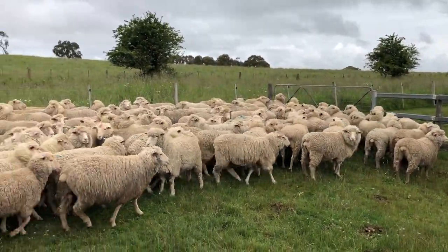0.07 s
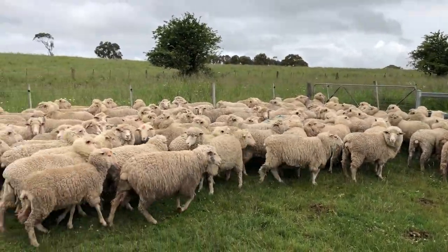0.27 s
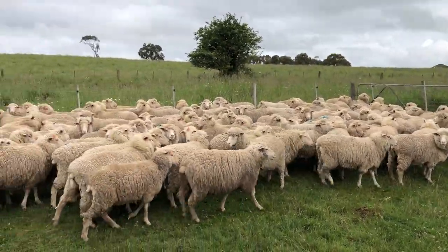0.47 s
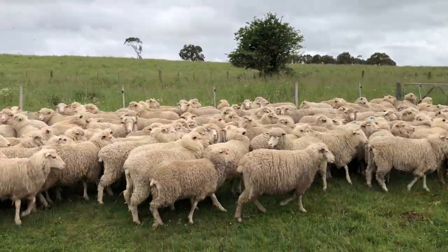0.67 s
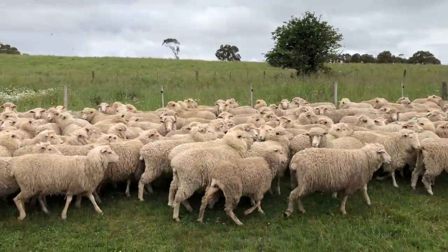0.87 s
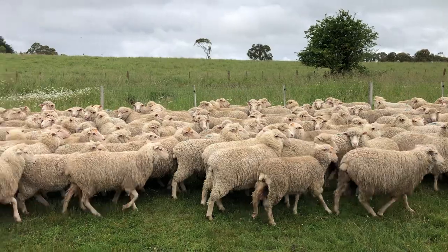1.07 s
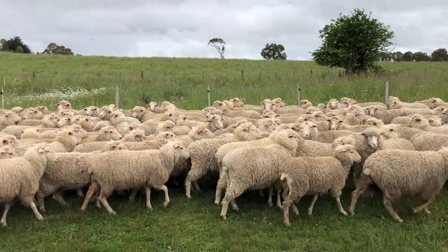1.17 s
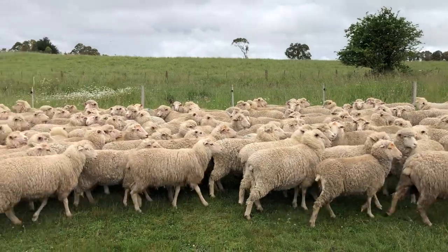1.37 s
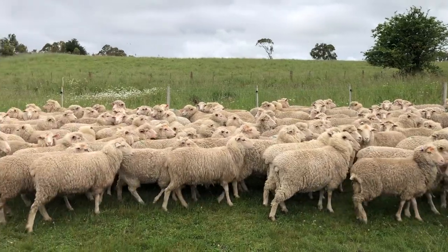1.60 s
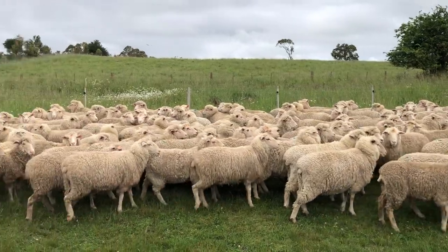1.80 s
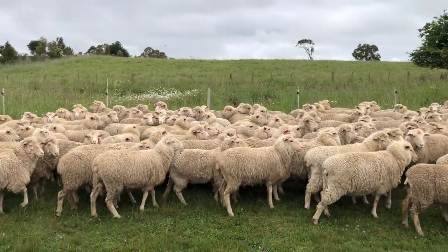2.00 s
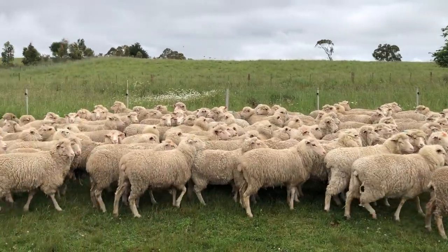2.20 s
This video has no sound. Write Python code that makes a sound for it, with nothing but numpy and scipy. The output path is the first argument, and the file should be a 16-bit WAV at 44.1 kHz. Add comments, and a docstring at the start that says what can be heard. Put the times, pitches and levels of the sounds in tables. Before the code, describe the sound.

A sheep bleats nearby and two answer farther off, with wind thumping on the microphone.

```python
"""A sheep bleats close by while wind buffets the microphone, with a few hard thumps.
Two more sheep answer from across the paddock; each bleat is a train of glottal pulses
filtered by the resonances of the throat. A bird gives falling whistles and a short buzzy rattle.
Underneath, turbulent air rumbles, the open field hisses and hooves brush the grass."""
import sys
import numpy as np
from scipy import signal
from scipy.fft import rfft, irfft
from scipy.io import wavfile

SR = 44100
rng = np.random.default_rng(int(sys.argv[2]) if len(sys.argv) > 2 else 0)


def generate_wav(sig):
    """Save sig (samples, or channels by samples) to the path in sys.argv[1] as 16-bit PCM at SR."""
    pcm = np.round(np.clip(np.atleast_2d(sig).T, -1, 1) * 32767).astype(np.int16)
    wavfile.write(sys.argv[1], SR, pcm)


N = 99225
T = np.arange(N) / SR


def amp(db):
    """Amplitude ratio of a level in decibels."""
    return 10 ** (np.asarray(db) / 20)


def unit(x):
    """Normalisation to rms 1."""
    return x / np.sqrt(np.mean(x ** 2) + 1e-20)


def add(mix, start_s, sound):
    """Superposition of a sound on the mix."""
    part = mix[max(round(start_s * SR), 0):][:len(sound)]
    part += sound[:len(part)]


def drift(hz):
    """Random modulation: low-pass noise of rms 1."""
    f = np.fft.rfftfreq(N, 1 / SR)
    return unit(irfft(rfft(rng.standard_normal(N)) / (1 + (f / hz) ** 4), N))


def colour(x, points, size=8192):
    """Minimum-phase filter through (frequency [Hz], gain [dB]) points."""
    hz, db = np.transpose(points)
    log_f = np.log(abs(np.fft.fftfreq(size, 1 / SR)) + 1)
    log_gain = np.log(amp(np.interp(log_f, np.log(hz), db)))
    response = np.fft.ifft(np.exp(np.conj(signal.hilbert(log_gain)))).real[:size // 2]
    return signal.fftconvolve(x, response)[:len(x)]


def gesture(course, edge_s=0.0072):
    """Pitch contour and amplitude envelope of a call, silent outside it."""
    s, hz, db = np.transpose(course)
    gate = np.clip(1 + np.minimum(T - s[0], s[-1] - T) / edge_s, 0, 1)
    return np.interp(T, s, hz), gate * amp(np.interp(T, s, db))


def voice(course, throat, jitter, shimmer, breath):
    """Source-filter model: uneven pulses, each with a puff of air, excite throat resonances."""
    hz, gain = gesture(course)
    cycles = np.cumsum(hz * (1 + jitter * drift(74))) / SR
    offset = (cycles + .5) % 1 - .5  # cycles from the nearest pulse
    pulses = np.sinc(offset / hz * SR / 2) * np.cos(np.pi * offset) ** 2
    puffs = np.exp(-(cycles % 1) / 0.9) * rng.standard_normal(N)
    source = unit(pulses) * (1 + shimmer * drift(120)) + breath * unit(puffs)
    return gain * unit(colour(source, throat))


# spectrum of the field's hiss (frequency [Hz], gain [dB])
HISS_SPECTRUM = [(500, 10), (1000, 9), (2000, 3.5), (4000, 0.5), (7000, -2.5), (11000, -3), (16000, -5.5)]

def field_hiss(level_db=-65.5):
    """Broadband noise of the open field, nearly constant in level."""
    return amp(level_db + 0.45 * drift(27)) * unit(colour(rng.standard_normal(N), HISS_SPECTRUM))


# hooves brushing grass (time [s], length [s], level [dB], centre frequency [Hz])
HOOF_BRUSHES = [(0.463, 0.0022, -67, 4850), (0.795, 0.012, -60.5, 7000), (0.81, 0.0061, -61.5, 9500),
                (.872, .0015, -65, 5500), (1.487, 0.017, -55.5, 3220), (1.503, 0.0099, -61.5, 4000),
                (1.702, 0.012, -57, 3400)]

def hooves(ticks_per_s=1100, clump_db=2.8, crackle_db=-70.5):
    """Shot noise: grass under hooves gives random impulses, as fine crackle and dense brushes."""
    ticks = (rng.random(N) < ticks_per_s / SR) * rng.standard_normal(N) * amp(clump_db * drift(25))
    out = amp(crackle_db) * unit(colour(ticks, [(1000, -37), (4500, -1), (16000, -2.5)]))
    for s, length, db, hz in HOOF_BRUSHES:
        grains = rng.standard_normal(N) * (rng.random(N) < .15)
        envelope = amp(db) * np.exp(-2 * ((T - s) / length) ** 2)
        out += envelope * unit(colour(grains, [(hz / 4, -14), (hz, 0), (hz * 3, -19)]))
    return out


# spectrum of the wind (frequency [Hz], gain [dB])
WIND_SPECTRUM = [(30, -35.5), (48, -1.5), (100, 0.5), (160, -1.5), (260, -11.5), (450, -21.5), (800, -32.5),
                 (1600, -68.5)]
# its envelope (time [s], level [dB])
WIND_LEVEL = [(0, -43), (.06, -42), (.11, -45.5), (.2, -43), (.265, -24.5), (.36, -37), (.6, -48.5),
              (.76, -44), (.88, -36.5), (1.05, -53), (1.12, -42.5), (1.27, -50.5), (1.56, -46),
              (1.68, -50.5), (2.07, -43.5), (2.12, -58), (2.25, -42)]

def wind_rumble(gust_db=2.2, gust_hz=22):
    """Turbulent pressure on the microphone: low noise, amplitude-modulated by gusts."""
    turbulence = unit(colour(rng.standard_normal(N), WIND_SPECTRUM))
    return turbulence * amp(np.interp(T, *np.transpose(WIND_LEVEL)) + gust_db * drift(gust_hz))


# eddies (time [s], length [s], level [dB], upper cutoff [Hz])
EDDIES = [(0.033, 0.016, -33, 440), (.221, 0.015, -26, 845), (0.242, 0.036, -20, 567),
          (0.275, 0.0097, -35.5, 523), (0.317, 0.026, -29, 480), (.486, 0.017, -33.5, 546),
          (0.522, 0.0087, -31.5, 546), (0.68, 0.02, -40.5, 343), (0.809, 0.039, -31.5, 557),
          (0.856, 0.032, -38.5, 430), (0.972, 0.034, -41, 370), (1.117, 0.041, -43.5, 395),
          (1.323, 0.015, -37, 370), (1.405, 0.03, -44.5, 377), (1.5, 0.038, -46, 343),
          (1.872, 0.013, -44, 278), (1.92, 0.018, -42.5, 346), (2.021, 0.039, -44, 357),
          (2.199, 0.021, -45.5, 353)]

def wind_buffets(rise_s=0.0052, fall_s=0.0085, order=5.25):
    """Each eddy is a burst of band-limited turbulence; stronger ones tend to reach higher."""
    out, t = np.zeros(N), T[:SR // 4]
    f = np.fft.rfftfreq(len(t), 1 / SR) + 1
    for s, length, db, upper_hz in EDDIES:
        lower_hz = 0.11 * upper_hz
        band = 1 / np.sqrt((1 + (f / upper_hz) ** (2 * order)) * (1 + (lower_hz / f) ** 4))
        rise = np.sin(np.pi / 2 * np.minimum(t / rise_s, 1)) ** 2
        fall = np.exp(-np.logaddexp(0, (t - length) / fall_s * 2))
        eddy = rise * fall * irfft(rfft(rng.standard_normal(len(t))) * band, len(t))
        rms = np.sqrt(np.sum(eddy ** 2) / (length * SR))
        add(out, s, amp(db) * eddy / rms)
    return out


# thumps on the microphone (time [s], peak level [dB], starting frequency [Hz])
WIND_THUMPS = [(.2262, -11, 1770), (0.2484, -18.5, 800), (.2586, -11.5, 2047), (.2598, -14, 1150),
               (0.2916, -19, 1215), (0.488, -25.5, 611.5), (0.8101, -22.5, 973), (0.826, -21.5, 1350),
               (0.9116, -30, 830), (1.1242, -31.5, 795)]

def wind_thumps(sag_cycles=1.87, peak_cycles=2.11):
    """Pressure transients: each is a downward chirp only a few cycles long."""
    out, t = np.zeros(N), T[:SR // 20]
    for s, db, hz in WIND_THUMPS:
        cycles = sag_cycles * np.log1p(hz * t / sag_cycles)
        progress = (cycles / peak_cycles) ** 3
        envelope = np.sqrt(progress * np.exp(1 - progress))
        add(out, s, amp(db) * envelope * np.sin(2 * np.pi * cycles))
    return out


# notes (overtone gain [dB], rows of (time [s], pitch [Hz], level [dB]))
BIRD_NOTES = [ (-26, [(1.21, 1796, -84), (1.24, 1840, -66), (1.3, 1660, -68), (1.318, 1475, -59),
              (1.328, 1294, -50.5), (1.337, 1300, -74)]), (0, [(1.333, 1847, -60), (1.343, 2070, -52),
              (1.353, 2020, -64)]), (-1.5, [(1.345, 1588, -60), (1.36, 1486, -53.5), (1.385, 1414, -52),
              (1.42, 1423, -55), (1.452, 1390, -60)]), (7, [(1.652, 1725, -70), (1.665, 1980, -66),
              (1.679, 1760, -59), (1.686, 1760, -68)]), (-1.5, [(1.685, 2084, -63), (1.705, 1953, -57.5),
              (1.745, 1923, -50.5), (1.785, 1892, -52.5), (1.81, 1885, -67)]), (-15, [(2.055, 2900, -76),
              (2.08, 2500, -72)]), (-1.5, [(2.142, 2085, -75), (2.168, 2020, -72), (2.2, 1985, -67)]),
              (-0.5, [(2.172, 1850, -65.5), (2.21, 1763, -62), (2.25, 1648, -56)])]
# response of the bird's throat to the overtones (frequency [Hz], gain [dB])
BIRD_THROAT = [(3000, -58), (3750, -59), (4700, -54.5), (5550, -58), (7600, -69)]

def bird_whistles(settle_s=.03, shimmer=.18, overtone_follow=0.24):
    """Frequency-modulated harmonic tones that start ragged, then settle, mostly falling."""
    out = np.zeros(N)
    waver, tremor = drift(225), 1 + shimmer * drift(115)
    for shrill_db, note in BIRD_NOTES:
        hz, gain = gesture(note)
        jitter = .004 + .025 * np.exp(-abs(T - note[0][0]) / settle_s)
        phase = 2 * np.pi * np.cumsum(hz * (1 + jitter * waver)) / SR
        overtones = np.zeros(N)
        for k in range(2, 6):
            throat_db = np.interp(k * hz, *np.transpose(BIRD_THROAT))
            overtones += amp(throat_db + shrill_db + 2 * drift(40)) * np.sin(k * phase)
        # the overtones follow the note's level only in part
        out += np.sqrt(2) * tremor * (gain * np.sin(phase) + gain ** overtone_follow * overtones)
    return out


# the rattle (time [s], pulse rate [Hz], level [dB])
RATTLE_COURSE = [(1.81, 133, -63), (1.85, 106, -66.5), (1.93, 102, -64), (2.02, 124, -71.5)]
# its resonances (frequency [Hz], gain [dB])
RATTLE_FORMANTS = [(600, -15), (1080, 11), (1450, -16), (1800, 1), (2050, 12.5), (2500, -4), (4500, -7),
                   (9000, -46)]

def bird_rattle():
    """Pulse excitation: slow, irregular, noisy pulses ring the throat as a dry buzz."""
    return voice(RATTLE_COURSE, RATTLE_FORMANTS, jitter=0.026, shimmer=0.13, breath=0.51)


# two answering bleats (time [s], pitch [Hz], level [dB])
FIRST_ANSWER = [(.89, 186, -68.5), (1.0, 206.2, -60.5), (1.04, 213.5, -70), (1.08, 225.5, -61),
                (1.12, 229.7, -72), (1.16, 250.6, -58), (1.2, 242.5, -64), (1.238, 256.2, -51.5),
                (1.26, 240, -77)]
SECOND_ANSWER = [(1.265, 221.8, -64), (1.3, 234.4, -51), (1.33, 213.8, -58), (1.365, 235.5, -52.5),
                 (1.385, 209, -65), (1.41, 204.3, -65), (1.432, 224.2, -47.5), (1.445, 220.5, -58),
                 (1.465, 191, -69)]
# their throat resonances (frequency [Hz], gain [dB])
FIRST_FORMANTS = [(500, 0.5), (950, -12.5), (1150, 7.5), (1350, -6), (1580, 1), (1950, -26), (2300, -9.5),
                  (2750, -16), (3300, -29), (6000, -26)]
SECOND_FORMANTS = [(440, 3), (650, 13), (900, -4.5), (1150, -2), (1400, 4.5), (1900, -9), (2300, 8),
                   (2650, 2.5), (3150, -15), (3600, -1), (4200, -20), (5000, -9.5), (8000, -20)]

def far_sheep():
    """Modulation of pitch and amplitude makes two distant bleats rough and quavering."""
    first = voice(FIRST_ANSWER, FIRST_FORMANTS, jitter=0.00295, shimmer=0.28, breath=.32)
    second = voice(SECOND_ANSWER, SECOND_FORMANTS, jitter=0.0072, shimmer=0.43, breath=.32)
    return first + second


# the near bleat (time [s], pitch [Hz], level [dB])
NEAR_BLEAT = [(-.01, 191, -43.5), (.03, 192.2, -49), (.116, 197.2, -49), (.168, 196.4, -48),
              (.19, 188.1, -50), (.212, 195.4, -48), (.238, 193.6, -51), (.296, 192.6, -46.5),
              (.31, 188.2, -48.5), (.334, 187.9, -49), (.352, 178.3, -52), (.378, 183.8, -51),
              (.398, 167, -61)]
# its throat resonances and the added filter of the closing mouth (frequency [Hz], gain [dB])
NEAR_FORMANTS = [(300, -31), (590, 1.5), (790, 0), (980, -16), (1180, -10.5), (1360, -7), (1720, 5),
                 (1970, -10), (2350, 3.5), (2560, -5.5), (2850, 6), (3140, -2.5), (3400, -4.5), (4200, -30),
                 (4550, -9.5), (5000, -13), (5650, -22.5), (8000, -31)]
MOUTH_FILTER = [(700, 5.5), (1100, 1), (1550, -6), (2300, 2), (3500, 1), (4600, -2.5), (5200, 3.5)]

def near_sheep(closing_span_s=(0.16, 0.38)):
    """A time-varying vocal tract: the closing mouth hollows out the middle of a clear bleat."""
    bleat = voice(NEAR_BLEAT, NEAR_FORMANTS, jitter=0.0036, shimmer=0.082, breath=.3)
    closure = np.interp(T, closing_span_s, [0, 1])
    return (1 - closure) * bleat + closure * colour(bleat, MOUTH_FILTER)


def scene():
    """Superposition of animals, field and wind in one channel."""
    animals = near_sheep() + far_sheep() + bird_rattle() + bird_whistles()
    return (animals + field_hiss() + hooves() + wind_rumble() + wind_buffets() + wind_thumps())[None]


def record(dry):
    """Band limiting by a linear-phase low-pass filter."""
    cutoff_hz = 15850
    lowpass = signal.firwin(511, cutoff_hz, window=("kaiser", 9), fs=SR)
    return signal.oaconvolve(dry, lowpass[None], "same")


dry = scene()
out = record(dry)
generate_wav(out)
```